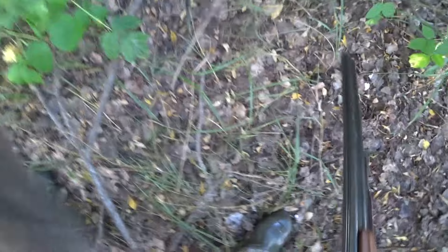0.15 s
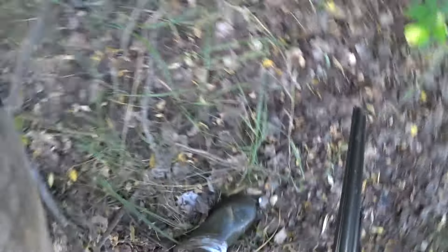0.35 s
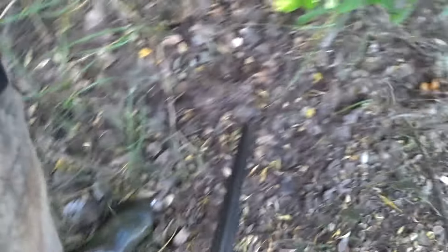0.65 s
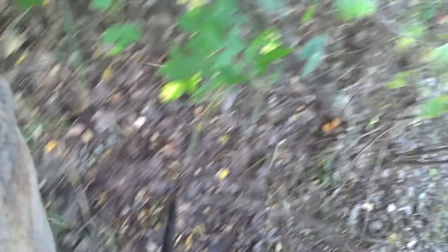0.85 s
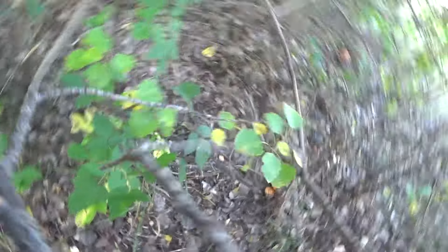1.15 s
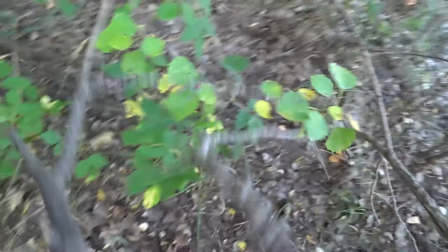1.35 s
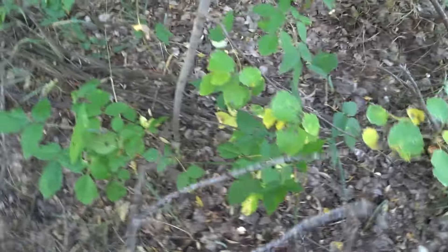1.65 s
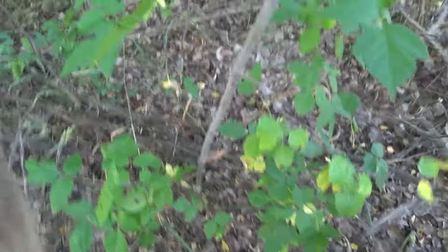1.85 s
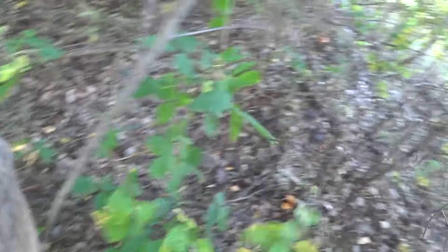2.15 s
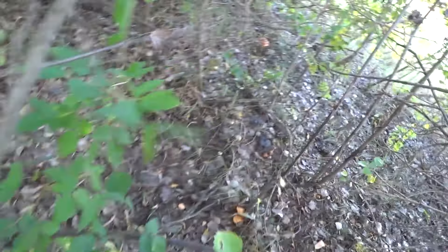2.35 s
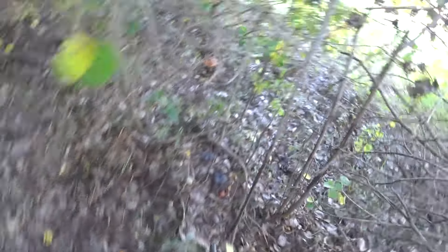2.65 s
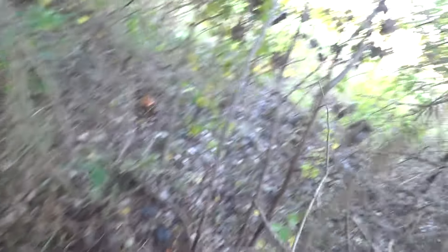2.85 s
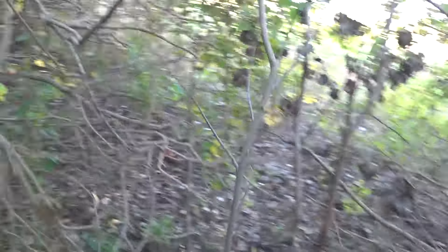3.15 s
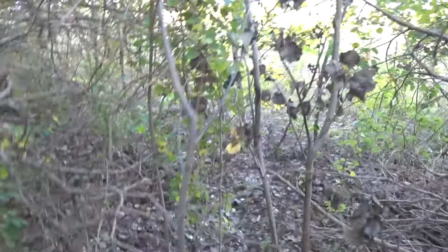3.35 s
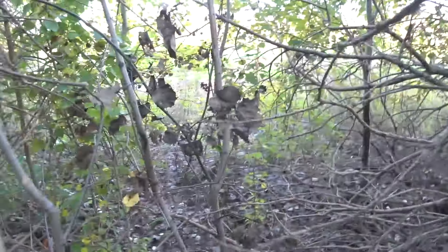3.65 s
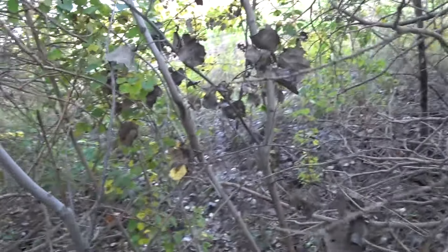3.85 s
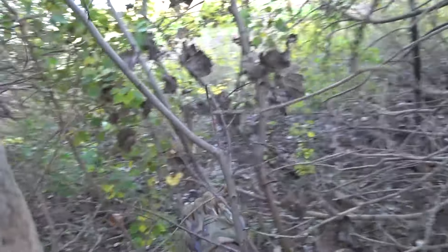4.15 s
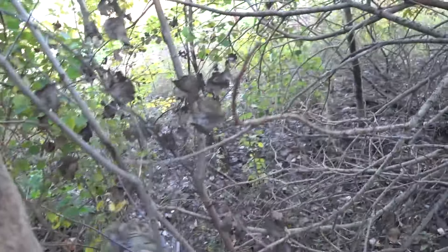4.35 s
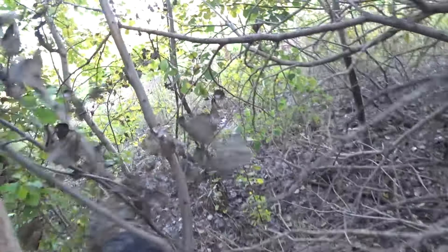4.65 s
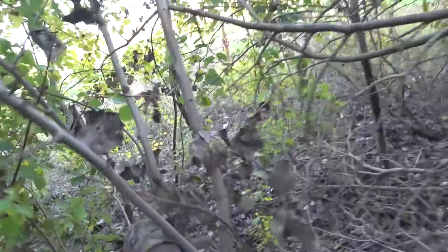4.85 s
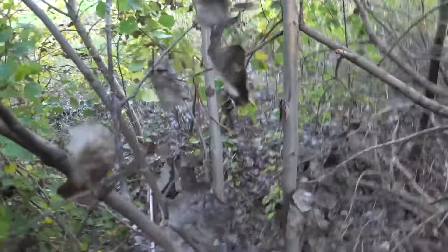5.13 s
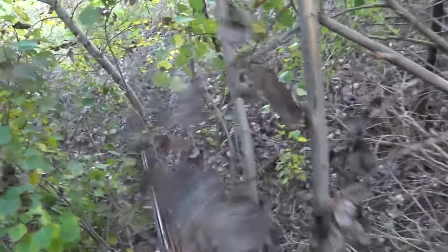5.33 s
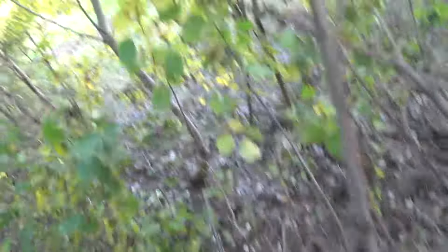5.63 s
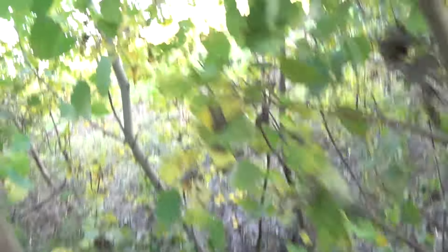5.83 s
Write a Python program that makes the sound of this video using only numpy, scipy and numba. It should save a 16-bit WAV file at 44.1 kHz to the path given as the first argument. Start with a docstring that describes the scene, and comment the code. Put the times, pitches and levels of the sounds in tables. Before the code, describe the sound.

A walker with a long gun pushes through a thicket. Dry leaves crackle, branches scrape and twigs snap hard in the first half second, then the movement thins to lighter rustles. Just before three seconds a cluster of snaps and hollow knocks begins, and the brushing grows thick to the end. The body-worn microphone picks up everything very close, with a wide stereo feel and faint still air beneath.

```python
"""Undergrowth in a wood: a walker pushes through with a long gun in hand and a small case on the body.
Dry leaves crackle and branches scrape as dense swarms of filtered noise grains; twigs snap and branches
knock on body and case as single noise bursts through resonances. The gun, one damped mode, hums briefly
after some knocks. Still air and body-borne rumble lie beneath. All is heard through the case's two
microphone ports, which sit almost in opposition in the mids."""
import sys
import numpy as np
from scipy import signal
from scipy.fft import rfft, irfft, next_fast_len
from scipy.io import wavfile
from scipy.ndimage import uniform_filter1d
from numba import njit

SR = 44100
rng = np.random.default_rng(int(sys.argv[2]) if len(sys.argv) > 2 else 0)


def digitize_waveform(pressure):
    """Quantize a signal to 16-bit integers and store it at the path in sys.argv[1].

    Rows of a 2-D input are taken as channels; values are limited to [-1, 1].
    """
    field = np.atleast_2d(pressure).T
    bounded = np.clip(field, -1, 1)
    quanta = np.round(bounded * 32767).astype(np.int16)
    wavfile.write(sys.argv[1], SR, quanta)


N = 264159  # samples
M = next_fast_len(N)  # transform length [samples]


def undb(db):
    """Level definition: dB to amplitude gain."""
    return 10 ** (np.asarray(db) / 20)


def curve(table):
    """Linear interpolation: the columns of a time table as sample-rate curves."""
    s, *columns = np.transpose(table)
    return [np.interp(np.arange(N) / SR, s, column) for column in columns]


def on_log_hz(points):
    """Interpolation on a logarithmic frequency axis: (Hz, value) points at every spectral bin."""
    hz, value = np.transpose(points)
    bin_hz = np.arange(M // 2 + 1) * SR / M
    return np.interp(np.log(bin_hz + 1), np.log(hz), value)


def unit(x):
    """Power normalisation: scaled to rms 1."""
    return x / np.sqrt(np.mean(x ** 2))


def pair(alike):
    """Partial coherence: two white noises with the given correlation."""
    a, b = rng.standard_normal((2, N + SR))
    alike = np.clip(alike, 0, 1)
    return np.array([a, alike * a + np.sqrt(1 - alike ** 2) * b])


def walk(rate):
    """Smoothed random steps: levels held for 1 / rate s, slewed between, with a spread near 1."""
    k = int(SR / rate)
    steps = np.repeat(rng.standard_normal(300), k)
    return uniform_filter1d(steps, k // 2 + 1)[:N]


@njit
def bursts(n, sr, noise, s, size, hz, width, push_s, ring_s, pan, rise):
    """Forced resonance: a rising, then fading noise push through one band-pass taken twice, scaled to its peak."""
    out, one = np.zeros((2, n + 8192)), np.zeros((2, 8192))
    for e in range(len(s)):
        start = int(s[e] * sr)
        g, k = np.tan(np.pi * hz[e] / sr), width[e] / hz[e]
        m = min(int((push_s[e] + ring_s[e]) * sr) + 8, 8192)
        fade = 1000. ** (-1 / (push_s[e] * sr))  # 60 dB over push_s
        top = 1e-12
        for c in range(2):
            b, l, b2, l2 = 0., 0., 0., 0.  # states of the two filters
            a, r = 1., 1.  # fading push, and what is left of its rise
            for i in range(m):
                push = (1 - r) * a * noise[c, start + i]
                v = (b + g * (push - l)) / (1 + g * (g + k))
                b, l = 2 * v - b, l + 2 * g * v
                a, r = a * fade, r * rise
                v = (b2 + g * (v - l2)) / (1 + g * (g + k))
                b2, l2 = 2 * v - b2, l2 + 2 * g * v
                one[c, i] = v
                top = max(top, abs(v))
        out[0, start:start + m] += one[0, :m] * size[e] * pan[e] / top
        out[1, start:start + m] += one[1, :m] * size[e] / pan[e] / top
    return out[:, :n]


def grains(alike, s, db, hz, width, push_s, pan_db, rise_s):
    """Bandwidth-decay relation: resonant bursts whose ring length follows from their width."""
    arrays = np.broadcast_arrays(s, db, hz, width, push_s, pan_db)
    s, db, hz, width, push_s, pan_db = (1. * v for v in arrays)
    hz = np.clip(hz, 60, .4 * SR)
    s, push_s = np.clip(s, 0, N / SR), np.clip(push_s, 2e-4, .1)
    ring_s = 2 * np.log(1000) / (np.pi * width)
    rise = np.exp(-1 / (rise_s * SR))
    return bursts(N, 1. * SR, pair(alike), s, undb(db), hz, width, push_s, ring_s, undb(pan_db / 2), rise)


def swarm(count, hz, octaves, q, push_s, length_octaves, scatter_db, alike):
    """Superposition of random grains at rms 1: a few are much larger than the rest."""
    at, size = rng.random(count), np.minimum(rng.exponential(size=count), 3.5)
    colour, length, pan = rng.standard_normal((3, count))
    centre = hz[(at * N).astype(int)] * 2 ** (octaves * colour)
    push_s = push_s * 2 ** (length_octaves * length)
    crackle = grains(alike, at * N / SR, scatter_db * size, centre, centre / q, push_s, 2.0 * pan, 0.00005)
    return unit(crackle)


# steady brushing through the growth:
# (time [s], leaf crackle level [dB], branch scrape level [dB], rumble through the body level [dB])
STEADY_BRUSHING = [(0.0, -37.5, -38.5, -54.5), (0.48, -35.5, -40, -56.5), (0.75, -42.5, -53, -64),
                   (1.02, -54.5, -50, -68), (1.17, -40.5, -44.5, -53), (1.67, -52, -49.5, -83),
                   (2.08, -37, -50, -76), (2.53, -45, -48.5, -85), (2.74, -40.5, -39, -81),
                   (2.93, -42.5, -40.5, -69), (3.22, -39.5, -37, -63), (3.69, -35.5, -36.5, -57),
                   (3.95, -44, -35.5, -70), (4.22, -37, -55.5, -65), (4.38, -63, -44, -55),
                   (4.46, -42, -41.5, -53), (4.59, -32, -37, -57), (4.85, -30.5, -37, -50.5),
                   (5.29, -34, -35.5, -61), (5.57, -30, -37, -81), (5.7, -38, -38.5, -88),
                   (5.99, -33.5, -52.5, -49)]
# single branches sweeping past:
# (start [s], length [s], leaf crackle level [dB], branch scrape level [dB])
BRANCH_SWEEPS = [(0.057, 0.067, -32, -49), (0.225, 0.048, -26, -44), (0.328, 0.054, -28, -31.5),
                 (0.53, 0.043, -30, -33), (0.579, 0.06, -33, -36.5), (1.135, 0.036, -29.5, -35.5),
                 (1.197, 0.045, -33, -35), (1.547, 0.021, -39, -38), (1.765, 0.04, -38, -42),
                 (1.821, 0.061, -36, -42.5), (1.942, 0.015, -30.5, -44), (2.292, 0.018, -32, -47),
                 (2.713, 0.015, -55, -36), (2.793, 0.018, -30, -28.5), (2.964, 0.16, -45, -33),
                 (3.36, 0.046, -27, -31), (3.417, 0.025, -22, -31.5), (3.503, 0.05, -27.5, -28.5),
                 (3.749, 0.041, -38, -29.5), (3.794, 0.028, -34, -32.5), (4.142, 0.11, -37, -43.5),
                 (4.39, 0.063, -41, -38), (4.612, 0.076, -47, -28), (4.778, 0.062, -33, -56),
                 (4.966, 0.05, -32, -50), (5.03, 0.014, -22.5, -26), (5.231, 0.03, -29.5, -47),
                 (5.327, 0.035, -28, -35.5), (5.434, 0.11, -24, -32.5), (5.593, 0.07, -24, -37),
                 (5.75, 0.023, -26, -41), (5.918, 0.16, -31.5, -37)]
SWEEP_ATTACK_S, SWEEP_T60_S = 0.013, 0.12


def effort():
    """Power addition: leaf and branch gains of steady brushing plus sweeps that rise, hold and die away."""
    t = np.arange(N) / SR
    start, length, *levels_db = np.transpose(BRANCH_SWEEPS)[:, :, None]
    attack = np.clip((t - start) / SWEEP_ATTACK_S, 0, 1)
    shape = attack * 1000. ** (-np.maximum(t - start - length, 0) / SWEEP_T60_S)
    gains = []
    for steady_db, sweep_db in zip(curve(STEADY_BRUSHING), levels_db):
        sweep_power = ((undb(sweep_db) * shape) ** 2).sum(axis=0)
        gains.append(np.sqrt(undb(steady_db) ** 2 + sweep_power))
    return gains


# pitch of the scrape, low while thick branches drag: (time [s], centre frequency [Hz])
SCRAPE_PITCH = [(0, 1270), (1.15, 1130), (1.4, 1270), (2.6, 1270), (2.8, 950), (3.65, 903), (3.85, 1260),
                (4.35, 945), (4.7, 985), (5.0, 1270), (5.99, 1170)]
TAP_DB_PER_OCTAVE = -13  # taps grow as the scrape drops in pitch: thick branches knock more


def brush(leaf, branch):
    """Friction as micro-impacts: short bright leaf grains, longer dull scrapes, twig ticks, crumbs and taps."""
    scrape_hz = curve(SCRAPE_PITCH)[0]
    flurry = walk(35)  # shared by leaves and scrape
    leaves = swarm(count=12000, hz=7400 * 2 ** (0.2 * walk(14)), octaves=0.45, q=0.6, push_s=0.004,
                   length_octaves=1.5, scatter_db=2.6, alike=0.85)
    scrape = swarm(count=7000, hz=scrape_hz, octaves=0.57, q=1.47, push_s=0.014,
                   length_octaves=2.02, scatter_db=1.0, alike=0.91)
    ticks = swarm(count=900, hz=np.full(N, 6000.), octaves=0.89, q=0.49, push_s=0.0016,
                  length_octaves=1.0, scatter_db=3.0, alike=0.13)
    # taps ring near the middle wood mode
    taps = swarm(count=400, hz=np.full(N, WOOD_MODES[1][0]), octaves=0.093, q=3.8, push_s=0.018,
                 length_octaves=0.51, scatter_db=4.0, alike=0.92)
    crumbs = swarm(count=700, hz=np.full(N, 1500.), octaves=0.72, q=1.3, push_s=0.0029,
                   length_octaves=1.0, scatter_db=3.5, alike=0.84)
    leaf_sound = leaf * leaves * undb(-3.5 + 2.07 * flurry)
    tick_sound = leaf ** 0.59 * ticks * undb(-24)  # ticks follow the leaves less than in proportion
    scrape = scrape * undb(5.5 + 0.97 * flurry + 1.45 * walk(45))
    crumbs = crumbs * undb(-3.0)
    taps = taps * undb(-2.7 + TAP_DB_PER_OCTAVE * np.log2(scrape_hz / 870))
    return leaf_sound + tick_sound + branch * (scrape + crumbs + taps)


# air of the wood, shape of the noise spectrum: (frequency [Hz], relative density [dB per Hz])
AIR_SPECTRUM = [(18, -56), (30, -49), (189, -9), (844, 10.5), (1760, 5.5), (3870, -5.5), (7090, -6),
                (9710, -6), (14800, -35), (16000, -19)]
AIR_DB = -44.5  # before the case


def air():
    """Spectral shaping: stationary noise filtered to the colour of the wood's still air."""
    spectrum = rfft(pair(0.36)[:, :M]) * undb(on_log_hz(AIR_SPECTRUM))
    return unit(irfft(spectrum, M)[:, :N]) * undb(AIR_DB)


def body_rumble():
    """Structure-borne sound: unsteady band-passed rumble and low-passed sway carried through the body."""
    rumble_band = signal.butter(2, [135, 330], "band", fs=SR, output="sos")
    rumble = signal.sosfilt(rumble_band, pair(0.064)[:, :N])
    sway = signal.sosfilt(signal.butter(1, 70, fs=SR, output="sos"), pair(0.82)[:, :N])
    body = undb(curve(STEADY_BRUSHING)[2])
    sway_gain = undb(-13.0) * body + undb(-74.0)  # the second term is a constant floor
    return unit(rumble) * undb(6.7 * walk(30)) * body + unit(sway) * sway_gain


# twig and leaf snaps, references for each snap's three parts:
# (time [s], reference level [dB], reference pitch [Hz], reference t60 of the push [s])
TWIG_SNAPS = [(0.027,-3.5,9400,0.0053), (0.0886,-18,8000,0.024), (0.124,-16,7600,0.0095),
              (.176,0,8300,0.0088), (0.2223,-11,6400,0.013), (0.328,-2.5,5600,0.016),
              (0.337,-2,4130,0.0082), (.376,-4.5,2870,0.015), (0.537,-13,2600,0.013),
              (0.597,-1.5,2530,0.052), (0.623,-4.5,4000,0.007), (.641,-11,9600,0.049),
              (1.046,-14,8900,0.011), (1.0605,-16,10100,.006), (1.064,-13.5,7200,0.0073),
              (1.0997,-15.5,10700,0.009), (1.171,-9.5,3800,0.018), (1.181,-3.5,11100,0.018),
              (1.225,-8,6800,0.0091), (1.543,-24,5060,.012), (1.727,-11,7640,0.0035),
              (1.865,-16,7500,0.011), (1.943,-18,9600,0.025), (2.0135,-24,8000,.005), (2.05,-18,4970,.008),
              (2.232,-14.5,9700,0.016), (2.594,-21.5,6140,0.028), (2.6717,-14,3480,0.0067),
              (2.71,-15,6500,0.008), (2.717,-16,5000,.008), (2.731,-7,5000,0.011), (2.7657,-6.5,5000,0.008),
              (2.7853,-3.5,5130,0.0077), (2.8049,0.5,8600,0.0067), (2.8164,-1,9600,0.0085),
              (2.848,-8,4550,0.023), (2.8755,-11.5,4570,0.012), (2.897,-17.5,4020,0.016),
              (2.9025,-19,3050,.01), (2.9615,-2.5,5030,0.01), (2.984,-13,9800,.011),
              (2.993,-11.5,10600,.012), (3.045,-13,8900,0.0093), (3.075,-19,7900,.015),
              (3.1024,-10,2600,.012), (3.1615,-9,5900,0.042), (3.18,-8,2620,0.028),
              (3.3545,-4.5,4970,0.0089), (3.426,-4,8500,0.037), (3.511,-5.5,9400,0.044),
              (3.527,0.5,10600,0.027), (3.604,-10.5,5900,0.023), (3.6665,-9.5,2940,0.015),
              (3.7403,0,10300,0.021), (3.751,1.5,4520,0.019), (3.76,-6.5,9500,.012), (3.788,-15,9000,.01),
              (3.8279,-8,10700,0.0058), (3.835,-14,8950,0.0056), (4.151,-6,7500,0.015),
              (4.1766,-4.5,8000,0.037), (4.2407,-11,3330,0.014), (4.309,-0.5,8400,0.0055),
              (4.3351,-5.5,2890,0.012), (4.3663,-9,10700,0.0042), (4.4048,-16,4400,0.0057),
              (4.4598,-8,7040,0.0058), (4.4663,-12,3430,.015), (4.6428,-12,6670,0.023),
              (4.672,-7.5,3900,0.011), (4.692,-3.5,2860,0.014), (4.709,-9,5040,0.015),
              (4.7871,-5.5,7500,0.02), (4.9914,-14,7800,0.05), (5.039,-9,10200,0.018),
              (5.047,-7,7400,0.063), (5.0808,-8,3900,0.014), (5.086,-4,3170,0.019), (5.115,-3,4800,0.0046),
              (5.133,-7,9300,0.01), (5.187,-2.5,7760,0.015), (5.25,-5,7200,0.0097), (5.3465,-7,5260,0.019),
              (5.3555,-10,5260,0.017), (5.408,-4.5,8300,0.0044), (5.412,-9,10000,0.011),
              (5.432,-10,10600,0.021), (5.442,-4.5,9700,0.02), (5.451,-2,7250,0.0069),
              (5.4978,-2.5,5440,0.011), (5.535,-5,7900,0.0085), (5.55,-3.5,11800,0.015),
              (5.563,-8.5,11800,0.0072), (5.745,-4,9640,0.065), (5.7723,-1.5,8800,0.022),
              (5.78,-6.5,8300,0.079)]


def snaps():
    """Brittle fracture: a sharp click, a pitched core and a short broad crack, each snap from its own side."""
    s, db, hz, t60 = np.transpose(TWIG_SNAPS)
    pan = 0.13 + 1.0 * rng.standard_normal(len(s))  # dB, left over right
    click = grains(0.65, s + 0.00046, db - 4.5, 600 + 0.65 * hz, 600 + 3.0 * hz, 0.0013, pan, .0001)
    core = grains(0.98, s, db - 12.5, hz, 0.2 * hz, t60, pan, 0.0001)
    crack = grains(0.25, s, db - 11.5, 0.58 * hz, 2.4 * hz, 1.26 * t60, pan, 0.0015)
    return click + core + crack


# branch knocks on body and case; a dead hit has a low ring:
# (time [s], reference blow level [dB], pitch [Hz], ring level against the blow [dB])
BRANCH_KNOCKS = [(0.051,-16,1110,-11.5), (0.163,-23,1700,-3), (.176,-11,733,-6), (0.224,-15,1870,-9),
                 (0.337,-18,554,5), (.354,-10,1410,2), (0.394,-4.5,626,-23), (.529,-22.5,1660,-2),
                 (0.549,-9.5,1310,-10), (.601,-12,638,-1.5), (1.152,-20,710,-6), (1.168,-20,762,1),
                 (1.182,-15.5,810,-9.5), (1.202,-16,504,-5), (1.298,-23,493,-6), (1.3162,-8.5,1470,-21),
                 (1.339,-18,1890,-10), (1.5515,-13.5,2700,-8), (1.731,-18.5,895,-13), (1.8,-24,810,-9.5),
                 (1.846,-23,2220,-8), (1.865,-22,1490,-18), (2.048,-23.5,766,-2), (2.072,-23.5,1010,-10),
                 (2.192,-22.5,1870,-11), (2.443,-30.5,1240,-3), (2.698,-17,920,-17), (2.71,-9.5,750,-10),
                 (2.717,-12.5,1530,-0.5), (2.765,-23,840,0), (2.788,-18,840,4), (2.805,-7.5,840,-5),
                 (2.848,-16,850,-4), (2.902,-25,800,-6), (2.963,-7,790,-7), (3,-26.5,530,1),
                 (3.023,-26,536,4.5), (3.045,-15.5,1480,-1), (3.077,-16.5,714,7), (3.086,-25.5,2050,8),
                 (3.096,-22.5,690,5), (3.137,-25,693,1), (3.16,-25,764,1), (3.18,-17.5,753,2),
                 (3.202,-12.5,1380,-1), (3.225,-19,820,-6), (3.251,-28,590,3), (3.33,-29,755,3),
                 (3.353,-20,786,-3), (3.371,-13.5,786,2), (3.39,-13.5,760,-2), (3.462,-17,727,-0.5),
                 (3.493,-15.5,790,0.5), (3.52,-11.5,780,-2), (3.535,-19.5,770,2), (3.541,-24,340,-4),
                 (3.563,-24,750,0.5), (3.584,-18,790,-2), (3.601,-22,750,2), (3.699,-7.5,654,-17),
                 (3.752,-6.5,700,-3), (3.815,-22,1400,1), (3.828,-12,1600,-4.5), (3.959,-21,1870,0),
                 (4.223,-13.5,970,-24), (4.31,-18.5,1550,-5), (4.3357,-13.5,590,-11.5),
                 (4.3656,-21,1460,-12), (4.4044,-9,1810,-15), (4.46,-10,970,-11), (4.624,-7.5,920,-15),
                 (4.631,-10.5,600,-10), (4.643,-14,1100,-9), (4.658,-20,1560,-0.5), (4.673,-23,585,0),
                 (4.694,-19,1020,-8), (4.786,-31,1200,-14), (4.965,-23,1690,2), (4.97,-23,313,-10),
                 (5.043,-14.5,1440,-4.5), (5.046,-17,2550,-4), (5.083,-9,712,-7), (5.088,-13,1600,-4),
                 (5.0917,-1.5,930,-33), (5.111,-13,1080,-9), (5.133,-14.5,790,-9), (5.503,-20,1690,0),
                 (5.524,-21,1490,4.5), (5.563,-12,766,-10), (5.771,-13,1320,-3.5)]
# modes that every knock rings with: (frequency [Hz], width [Hz], relative level [dB])
WOOD_MODES = [(570, 101, -10), (753, 165, -5.5), (1393, 620, -1.5)]
RING_CYCLES = 37  # reference t60 in cycles of the knock's pitch; each part takes a share
BODY_DB_PER_OCTAVE = -19  # above 1500 Hz: thin, high twigs hardly stir the body


def knocks():
    """Modal excitation: a one-cycle blow and low bump, then ringing at its own pitch, wood modes and a thud."""
    s, db, hz, ring_db = np.transpose(BRANCH_KNOCKS)
    t60, ring = RING_CYCLES / hz, db + ring_db
    body = ring + BODY_DB_PER_OCTAVE * np.log2(np.maximum(hz / 1500, 1))
    blow = grains(0.92, s + .0006, db + 1.5, 0.95 * hz, 0.96 * hz, .0012, 0, 0.00025)
    bump = grains(0.44, s, db - 25.5, 242, 200, 0.71 * t60, 0, 0.0014)
    wood = sum(grains(0.98, s, body + mode_db, mode_hz, width, 0.43 * t60, 0, 0.00084)
               for mode_hz, width, mode_db in WOOD_MODES)
    own_pitch = grains(0.97, s, ring + 4, hz, 0.17 * hz, 0.55 * t60, 0, 0.000083)
    thud = grains(0.89, s, body - 5, 700, 1320, 1.0 * t60, 0, 0.00047)
    return blow + bump + own_pitch + undb(3.5) * wood + thud


# hum of the gun after a jolt: (time [s], level before flutter [dB])
GUN_HUM = [(.18, -40.5), (.345, -40), (.62, -46.5), (1.62, -53), (1.801, -52.5), (2.709, -55), (2.797, -39),
           (2.971, -39), (3.14, -42), (3.369, -38), (3.54, -46), (3.764, -35), (4.32, -43.5), (4.689, -35),
           (5.06, -42), (5.569, -45)]
HUM_HZ = 247.7  # the pitch wanders around this
HUM_DAMPED_S = 0.35  # until 60 dB down
HUM_FLUTTER_DB = 3  # spread of the level


def gun():
    """Damped single mode: a long mode swells after a jolt and is soon, unevenly, damped by the hand."""
    t = np.arange(N) / SR
    size = np.zeros(N)
    for s, db in GUN_HUM:
        swell = np.clip((t - s) / 0.0014, 0, 1)
        damping = 1000. ** (-(np.maximum(t - s, 0) / HUM_DAMPED_S) ** 1.41)
        size += undb(db) * swell * damping
    phase = 2 * np.pi * np.cumsum(HUM_HZ * (1 + 0.01786 * walk(30))) / SR
    flutter = undb(HUM_FLUTTER_DB * walk(45))
    return np.sqrt(2) * size * flutter * np.sin(phase) * np.ones((2, 1))


def scene():
    """Linear superposition: all sources, with leaves and branches driven by the walker's effort."""
    leaf, branch = effort()
    return snaps() + knocks() + brush(leaf, branch) + gun() + air() + body_rumble()


@njit
def follow(x, fall):
    """Peak detection: the envelope jumps up at once and sinks slowly."""
    e, y = 1e-9, np.empty(len(x))
    for i in range(len(x)):
        e = max(x[i], e * fall)
        y[i] = e
    return y


# case resonances: (frequency [Hz], width [Hz], boost [dB])
CASE_RESONANCES = [(658, 16, -1), (1710, 870, 2), (5170, 71, 3), (9180, 5800, 3)]
# phase gap between the ports: (frequency [Hz], lead of the left [rad])
PORT_PHASE = [(90, -.3), (200, -2.0), (780, -2.45), (1800, -2.4), (3300, -1.6), (4900, -.9), (6500, -.55),
              (16000, -.5)]
# level gap between the ports: (frequency [Hz], left over right [dB])
PORT_BALANCE = [(300, 0.3), (3000, 0.45), (9000, 1), (14000, 2)]
LIMIT_DB, LIMIT_RATIO, RELEASE_S = -13.5, 1.39, 0.039  # threshold, ratio, envelope time constant
TOP_HZ = 15900


def record(dry):
    """Transfer function and compression: case, port gaps, bass cut, gain control, soft clipping, top cut."""
    f = np.arange(M // 2 + 1) * SR / M
    colour = undb(sum(db / (1 + (2 * (f - hz) / width) ** 2) for hz, width, db in CASE_RESONANCES))
    side = np.array([[1], [-1]])  # left, right: each takes half of a gap
    turn = np.exp(.5j * on_log_hz(PORT_PHASE) * side)
    balance = undb(on_log_hz(PORT_BALANCE) / 2 * side)
    x = irfft(rfft(dry, M) * colour * turn * balance, M)[:, :N]
    x = signal.sosfilt(signal.butter(1, 60, "high", fs=SR, output="sos"), x)
    # loud cracks pull the gain down just after they pass, so the rustle ducks behind them
    envelope = follow(np.abs(x).max(axis=0), np.exp(-1 / (RELEASE_S * SR)))
    over = np.maximum(envelope / undb(LIMIT_DB), 1)
    gain_change = over ** (1 / max(LIMIT_RATIO, 1) - 1) - 1
    slew = np.exp(-1 / (0.0015 * SR))
    x = x * signal.lfilter([1 - slew], [1, -slew], gain_change) + x
    x = np.tanh(1.175 * x) / 1.07
    return signal.sosfilt(signal.ellip(10, .2, 75, TOP_HZ, fs=SR, output="sos"), x)


dry = scene()
out = record(dry)
digitize_waveform(out)
```